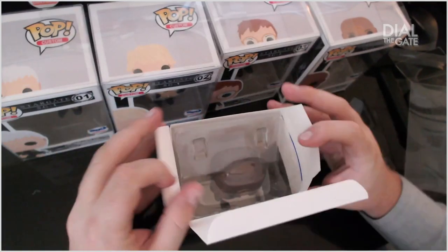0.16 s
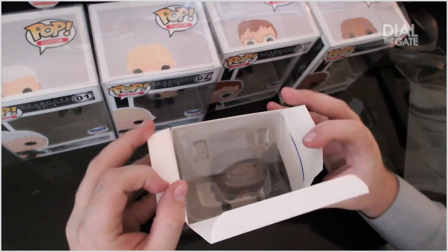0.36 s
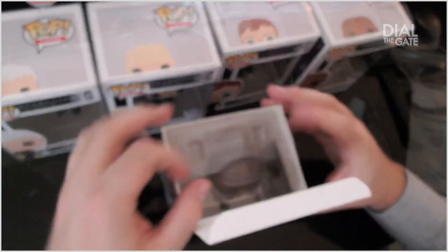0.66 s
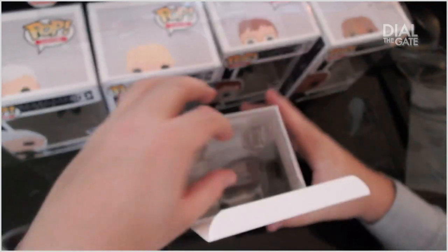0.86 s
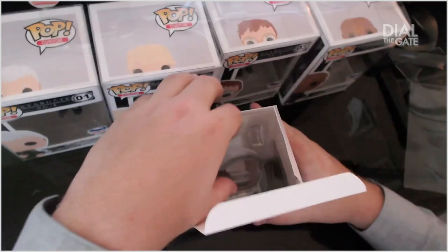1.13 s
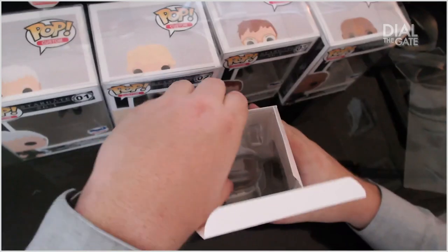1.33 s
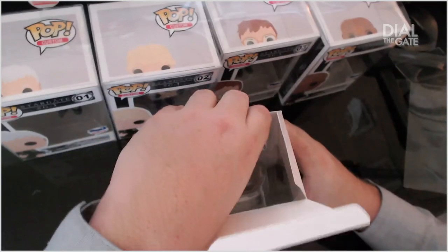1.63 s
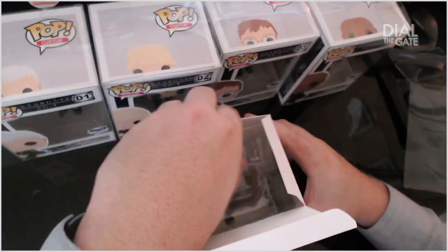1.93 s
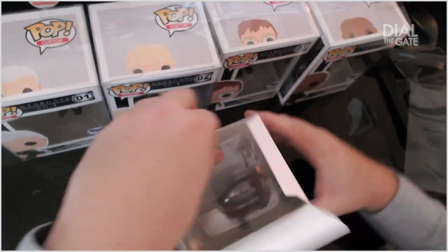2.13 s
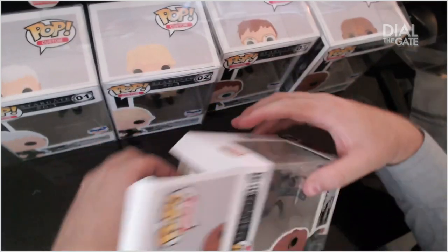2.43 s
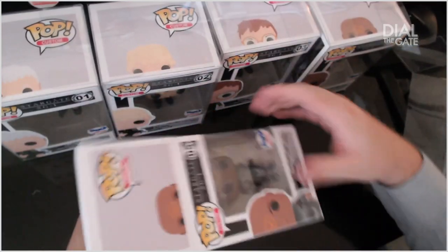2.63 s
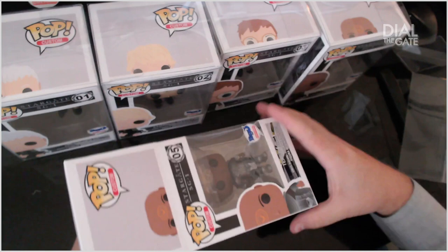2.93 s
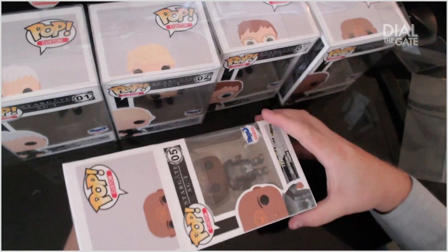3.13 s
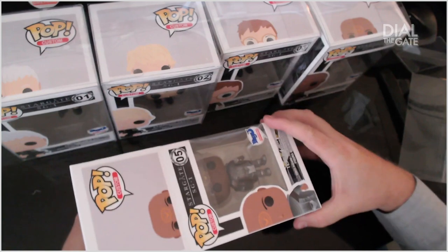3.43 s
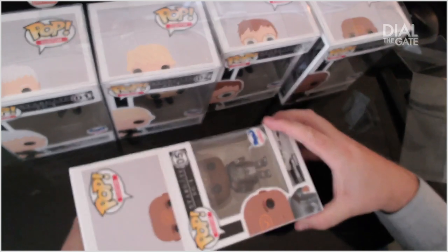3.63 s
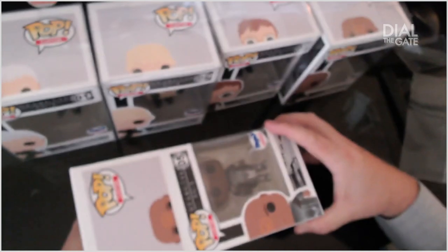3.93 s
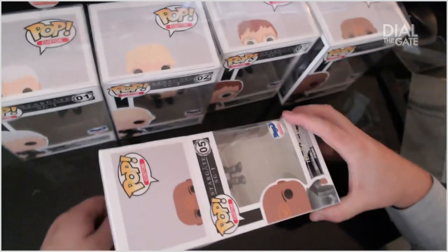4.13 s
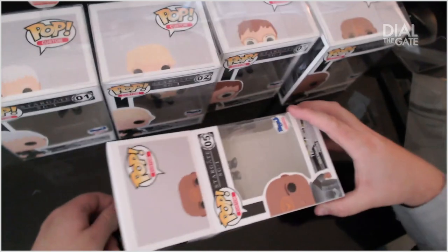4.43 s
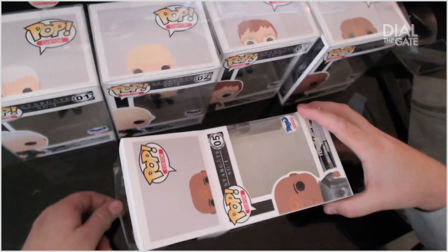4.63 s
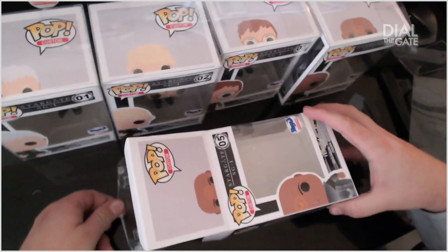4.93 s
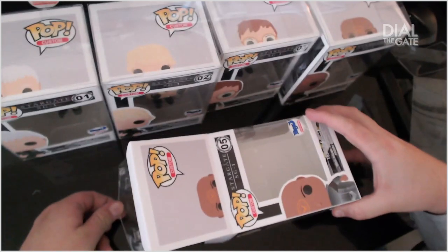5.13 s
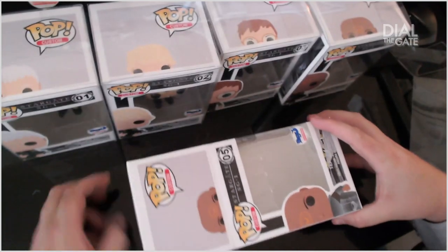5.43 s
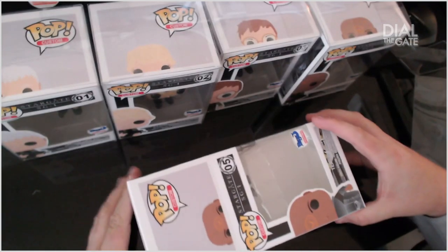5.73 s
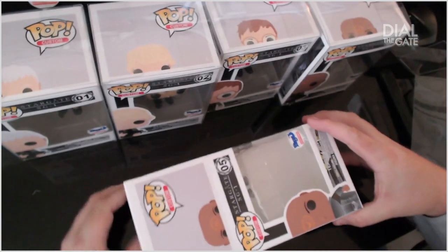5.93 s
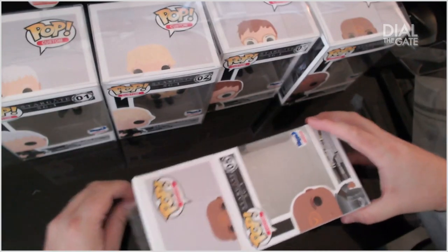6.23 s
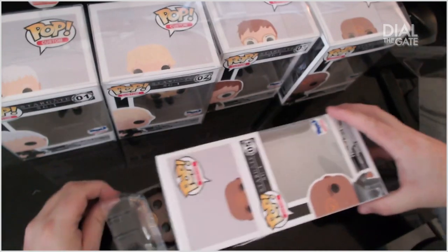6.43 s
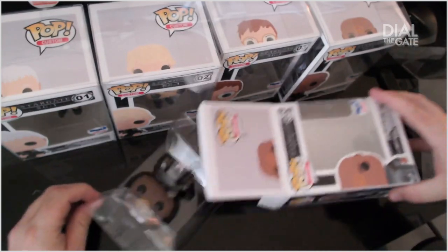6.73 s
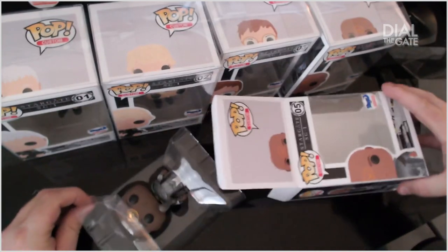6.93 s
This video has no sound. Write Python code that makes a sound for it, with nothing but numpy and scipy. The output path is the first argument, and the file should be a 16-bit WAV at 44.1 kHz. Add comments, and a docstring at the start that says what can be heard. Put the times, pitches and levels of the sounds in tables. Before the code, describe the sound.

Close to the microphone, hands open a small cardboard box on a table. Sparse dull taps and faint plastic ticks come first, then a hollow bump with low table thuds around a third of the way in. Midway a tight cluster of sharp plastic cracks bursts out, by far the loudest moment. Separate clicks, short scrapes and more knocks follow as the tray slides free. Quiet hum and hiss lie beneath, with short room echoes.

```python
"""Over a quiet hum and hiss, hands start to open a small cardboard box on a table, close to the microphone.
Knocks ring the box walls as decaying tones, and rubbing is made of grains of noise.
A thin plastic tray ticks in short bright bursts of noise as it is pulled out, most loudly near 3.9 s.
Thuds of the table are low, brief swings; the handling goes on to about 7 s.
A furnished room answers everything with fading echoes."""
import sys
import numpy as np
from scipy import signal
from scipy.fft import rfft, irfft, next_fast_len
from scipy.io import wavfile
from scipy.ndimage import uniform_filter1d

SR = 44100
rng = np.random.default_rng(int(sys.argv[2]) if len(sys.argv) > 2 else 0)


def gain_from_db(level_db):
    """Convert decibel levels to linear amplitude factors (20 dB per decade)."""
    decades = np.asarray(level_db, float) / 20
    return 10 ** decades


def generate_wav(signal):
    """Clip the signal to [-1, 1] and save it as 16-bit WAV at the path in sys.argv[1]."""
    frames = np.transpose(np.atleast_2d(signal))
    scaled = np.clip(frames, -1, 1) * 32767
    pcm = np.round(scaled).astype(np.int16)
    wavfile.write(sys.argv[1], SR, pcm)


N = 311787  # samples in the scene
TIME = np.arange(N) / SR  # seconds

# ringing modes of the box walls and the air inside, before the grip retunes and shortens them:
# (pitch_hz, level_db, t60_s: time to fall by 60 dB)
BOX_MODES = [(240, -27, 0.092), (344, -16, 0.024), (425, 10, 0.042), (523.4, 4.5, 0.06),
             (634.3, 2.5, 0.075), (744, 4, 0.053), (939, 3.5, 0.061), (1080, 1, 0.067), (1192, 5, 0.052),
             (1350, 9.5, 0.023), (1610, 9.5, 0.023), (1716.6, 7, 0.04), (2120, 12, 0.0086),
             (2433, 10, 0.017), (2784, 7.5, 0.0063), (3078, -9, 0.052)]


def rms1(x):
    """Scales a sound to an rms of 1, so that a later gain sets its level."""
    return x / np.sqrt(np.mean(x ** 2))


def colour(x, points):
    """Filters a sound by a spectrum of (pitch_hz, level_db) points; outside them it is nearly silent."""
    hz, db = np.transpose(points)
    size = next_fast_len(len(x))
    bins_hz = np.arange(size // 2 + 1) * SR / size + 1
    gain_db = np.interp(np.log(bins_hz), np.log(hz), db, left=-80, right=-80)
    return irfft(rfft(x, size) * gain_from_db(gain_db), size)[:len(x)]


def add(out, start_s, db, shape):
    """Adds a sound at start_s, scaled so that its loudest millisecond reaches db (a full sine is 0 dB)."""
    first = int(start_s * SR)
    part = shape[:N - first]
    loudest_power = uniform_filter1d(shape ** 2, size=48).max()
    out[first:first + len(part)] += gain_from_db(db) * part / np.sqrt(2 * loudest_power)


def burst(noise, length_ms):
    """Many tiny contacts that swell quickly and die away; together they favour no pitch."""
    t = np.arange(len(noise)) / SR * 1000 / max(length_ms, 0.2)
    power_shape = (1 - np.exp(-3.0 * t)) * np.exp(-t)
    spectrum = rfft(noise * power_shape)
    flat = irfft(spectrum / np.abs(spectrum))  # every pitch equally strong
    return flat * np.sqrt(power_shape)


def grit(spread_db, grain_ms):
    """Friction noise in short grains of very uneven size."""
    grain = max(int(grain_ms * SR / 1000), 1)
    size_db = spread_db * np.minimum(rng.exponential(size=N), 5.0)
    size_db = np.repeat(size_db, grain)[:N]
    smooth_size = uniform_filter1d(gain_from_db(size_db), grain)
    return rms1(rng.standard_normal(N) * smooth_size)


def floor():
    """Air and microphone hiss as coloured noise, with the low wavering hum of a machine in the house."""
    # hum tones: (pitch_hz, level_db: rms)
    hum_tones = [(32.3, -70), (193.8, -82.5)]
    # shape of the hiss: (pitch_hz, relative level_db per Hz)
    air_spectrum = [(15, -33), (25, 2.5), (40, -10.5), (60, -4), (120, -28), (200, -10.5), (400, -9),
                    (1000, -19.5), (2300, -27.5), (3500, -29), (8000, -28), (12000, -30), (15500, -30),
                    (16300, -35)]
    air_db = -70  # rms
    waver_db = 2.4 * rms1(colour(rng.standard_normal(N), [(1.5, -3), (10, 11), (30, -27)]))
    hum = np.zeros(N)
    for hz, db in hum_tones:
        hum += gain_from_db(db + waver_db) * np.sqrt(2) * np.sin(2 * np.pi * hz * TIME)
    hiss = gain_from_db(air_db) * rms1(colour(rng.standard_normal(N), air_spectrum))
    return hum + hiss


def room(x):
    """Dense echoes, made of noise whose fading time depends on pitch."""
    # fading of the room: (pitch_hz, t60_s: time to fall by 60 dB)
    room_fading = [(125, 0.084), (500, 0.39), (2000, 0.17), (6000, 0.33), (14000, 0.15)]
    echo_db = -7.5  # energy of the echoes against the direct sound
    hz, t60 = np.transpose(room_fading)
    f, t, z = signal.stft(rng.standard_normal(SR), SR, nperseg=256)
    t60_at_f = np.interp(np.log(f + 1), np.log(hz), t60)
    z = z * 1000 ** (-t / t60_at_f[:, None])
    tail = signal.istft(z, SR, nperseg=256)[1][:SR]
    tail = tail * (1 - np.exp(-TIME[:SR] / 0.0051))  # the first surfaces are a metre or two off
    tail = tail / np.sqrt(np.sum(tail ** 2))
    return gain_from_db(echo_db) * signal.fftconvolve(x, tail)[:N]


def thuds():
    """The table top swings briefly under the weight of box and hands: low sines that die away."""
    # thuds: (start_s, level_db: loudest millisecond, pitch_hz, t60_s: time to fall by 60 dB)
    thud_table = [(0.069, -53.5, 152, 0.17), (0.598, -57.5, 97, 0.1), (2.231, -51, 45, 0.36),
                  (2.344, -54, 80, 0.11), (2.472, -41, 45, 0.13), (2.549, -59, 102, 0.17),
                  (2.602, -42, 89, 0.48), (2.639, -46, 74.5, 0.22), (2.799, -50, 76.6, 0.32),
                  (2.851, -53.5, 246, 0.17), (3.316, -51.5, 255, 0.062), (3.896, -38, 248, 0.1),
                  (5.273, -50.5, 212.5, 0.22), (6.429, -47, 216, 0.11), (6.548, -51, 69.6, 0.064),
                  (6.709, -40, 240, 0.029)]
    out, t = np.zeros(N), np.arange(SR // 2) / SR
    for start_s, db, hz, t60 in thud_table:
        swell = 1 - np.exp(-t / 0.0061)
        fade = 1000 ** (-t / max(t60, 0.02))
        add(out, start_s, db, np.sin(2 * np.pi * hz * t) * swell * fade)
    return out


def slide_levels():
    """Friction levels of box, tray and table: slides swell, hold and fade, their power added to the grip's."""
    # slides of hand, box and tray: (start_s, length_s, box_level_db, tray_level_db, table_level_db)
    slide_table = [(0.0, 0.22, -65.5, -83, -63), (0.313, 0.11, -64, -87, -69), (0.52, 0.095, -74, -97, -66),
                   (1.008, 0.37, -71, -82, -73.5), (1.412, 0.087, -66, -77, -75),
                   (1.665, 0.18, -64, -75, -70), (2.014, 0.19, -68, -76, -70), (2.298, 0.12, -70, -75, -64),
                   (2.492, 0.099, -49.5, -67.5, -50), (2.6, 0.075, -62, -74, -64),
                   (2.74, 0.084, -73, -82, -64.5), (2.83, 0.22, -68, -78, -68),
                   (3.06, 0.16, -57.5, -68, -67), (3.308, 0.14, -67, -72, -70),
                   (3.537, 0.08, -61.5, -64, -76), (3.65, 0.11, -69, -70.5, -69),
                   (3.914, 0.054, -46, -43, -57.5), (4.012, 0.047, -53, -64, -60),
                   (4.1, 0.19, -57, -69.5, -66), (4.322, 0.14, -60, -66.5, -64.5),
                   (4.473, 0.074, -58.5, -66, -64), (4.617, 0.3, -69.5, -78, -72),
                   (4.868, 0.064, -70.5, -68.5, -81), (4.946, 0.063, -57.5, -57.5, -79),
                   (5.121, 0.19, -57, -62, -64.5), (5.522, 0.067, -51.5, -58.5, -60.5),
                   (5.62, 0.13, -62.5, -75.5, -66.5), (6.015, 0.045, -60, -65.5, -70),
                   (6.13, 0.07, -50, -59, -58), (6.277, 0.13, -54, -58.5, -63.5),
                   (6.455, 0.02, -50, -60, -51.5), (6.543, 0.078, -52, -57.5, -53.5),
                   (6.629, 0.089, -55, -58.5, -56), (6.834, 0.019, -59, -70.5, -62),
                   (6.941, 0.11, -67, -67, -62)]
    # friction while the hands only hold on: (box_level_db, tray_level_db, table_level_db)
    resting_db = (-81, -82, -74)
    rise_db_s, fall_db_s = 322, 152  # swell before the start, fade after the end, in dB per second
    power = gain_from_db(2 * np.array(resting_db))[:, None] * np.ones(N)
    for start_s, length_s, *db in slide_table:
        before_s = np.maximum(start_s - TIME, 0)
        after_s = np.maximum(TIME - start_s - length_s, 0)
        shape_db = -rise_db_s * before_s - fall_db_s * after_s
        power = power + gain_from_db(2 * np.array(db))[:, None] * gain_from_db(2 * shape_db)
    return 10 * np.log10(power)


def rubbing():
    """Friction grains and stray taps, fluttering with the grip, drive box and tray; the table adds soft noise."""
    # colour of the rubbed plastic: (pitch_hz, relative level_db per Hz)
    tray_spectrum = [(1470, -15), (2500, 0), (3180, -1), (4050, -7.5), (4690, -5.5), (5870, -10.5),
                     (9660, -10), (14500, -21.5), (16000, -23)]
    lift_db, lift_per_db = 5.5, 0.6753  # gain of the upper box modes, and its change with the tray's share
    taps_per_s, tap_db, tap_spread_db = 25, 2, 2.5  # stray light taps, level over the steady friction
    grain_spread_db = 2.3

    box_db, tray_db, table_db = slide_levels()
    upper_db = np.clip(lift_db + lift_per_db * (tray_db - box_db), -12, 12)
    grip_db = 0.88 * rms1(colour(rng.standard_normal(N), [(8, 30), (60, -49), (200, -26)]))

    tap_happens = rng.random(N) < taps_per_s / SR
    taps = tap_happens * gain_from_db(tap_db + tap_spread_db * np.minimum(rng.exponential(size=N), 3))
    # the power of each tap dies away with a time constant of 4.2 ms
    tap_power = signal.lfilter([1], [1, -np.exp(-1000 / SR / 4.2)], taps ** 2)
    snag = np.sqrt(1 + tap_power)

    grains = grit(grain_spread_db, 2.3) * gain_from_db(grip_db) * snag
    is_upper = np.array(BOX_MODES)[:, 0] > 1000
    # each half of the box rings with the other half turned down by 60 dB
    low = signal.fftconvolve(grains, ring(-60.0 * is_upper, shorten=0.34))[:N]
    high = signal.fftconvolve(grains, ring(-60.0 * ~is_upper, shorten=0.34))[:N]
    box = (rms1(low) + rms1(high) * gain_from_db(upper_db)) * gain_from_db(box_db)

    plastic = colour(grit(grain_spread_db, 2.0) * snag, tray_spectrum)
    tray = rms1(plastic) * gain_from_db(tray_db + grip_db)

    wood_spectrum = [(30, -6), (66, -6.5), (77, -0.5), (90, -5.0), (200, -7), (400, -20.0)]
    table = rms1(colour(rng.standard_normal(N), wood_spectrum)) * gain_from_db(table_db)
    return box + tray + table


def ticks():
    """Thin plastic buckles: a few ms of ragged bright crackle around a centre, each with its own patchy colour."""
    # ticks of the tray: (start_s, level_db: loudest millisecond, centre_hz, crackle_length_ms)
    tick_table = [(0.0852, -54.5, 4250, 1.9), (0.169, -64, 3500, 2.6), (0.212, -62.5, 5000, 8),
                  (0.251, -63, 3500, 2.6), (0.326, -62, 2600, 3.1), (0.3395, -50.5, 4750, 5.4),
                  (0.5731, -62, 4830, 4.3), (0.587, -57.5, 8570, 4), (0.638, -63, 4500, 2.4),
                  (1.0031, -66, 5660, 3.5), (1.0151, -62, 5650, 3.5), (1.0298, -54.5, 3830, 3),
                  (1.1095, -51, 3870, 3.2), (1.2144, -50, 4000, 5), (1.31, -56, 3880, 2.6),
                  (1.332, -54.5, 5340, 2.5), (1.508, -44.5, 7800, 2), (1.657, -58.5, 3450, 3.8),
                  (1.792, -58, 6040, 5.4), (2.02, -45.5, 8600, 8.1), (2.045, -52.5, 5500, 2.8),
                  (2.0988, -54, 4900, 3.3), (2.1264, -52.5, 7460, 3.5), (2.1793, -48.5, 4660, 2.3),
                  (2.4614, -51, 3570, 2.3), (2.5417, -46.5, 8150, 7.8), (2.842, -51.5, 4800, 6.4),
                  (3.032, -56.5, 4830, 5.1), (3.098, -45, 7960, 4.9), (3.2088, -52.5, 3770, 3.6),
                  (3.304, -48, 3570, 2.1), (3.4157, -50, 6130, 1.9), (3.4447, -51, 4770, 5.8),
                  (3.513, -49.5, 3550, 1.7), (3.5435, -33.5, 8100, 3.5), (3.646, -36, 10200, 2.7),
                  (3.7494, -50.5, 8400, 4.7), (3.8484, -49, 8770, 3.5), (3.8549, -33, 8520, 3.1),
                  (3.8602, -20.5, 8300, 2.8), (3.869, -29.5, 5840, 13), (3.8916, -25, 5270, 1.9),
                  (3.897, -25.5, 8700, 20), (3.912, -38.5, 4720, 8), (3.9521, -21.5, 5170, 2.4),
                  (4.104, -52, 3580, 3.9), (4.1284, -46, 7850, 3), (4.158, -41, 4800, 1.2),
                  (4.4937, -36.5, 10000, 2.5), (4.6808, -61.5, 3580, 8.4), (4.8, -50, 5000, 4.6),
                  (4.9317, -51, 6540, 3.5), (4.9442, -33.5, 5660, 2.5), (4.984, -48, 8210, 4),
                  (5.146, -45.5, 3500, 3.9), (5.209, -42, 9050, 4.5), (5.2796, -48.5, 6440, 5.2),
                  (5.321, -64, 4050, 3.5), (5.3904, -58, 4480, 3.2), (5.484, -53.5, 4920, 16),
                  (5.511, -44, 7900, 6.8), (5.5278, -37, 5500, 5.2), (5.5411, -35, 4200, 3.5),
                  (5.61, -52, 5000, 2.6), (6.1056, -43, 3700, 12), (6.1228, -38, 7760, 5.1),
                  (6.2836, -54, 8270, 4), (6.297, -44, 4560, 4.1), (6.344, -36.5, 7500, 4.4),
                  (6.4375, -31.5, 7700, 3.2), (6.445, -38.5, 6540, 3.8), (6.5327, -39, 8550, 5),
                  (6.5448, -40, 5260, 4.1), (6.5872, -45, 4460, 3.5), (6.617, -46, 4580, 4.2),
                  (6.673, -46, 3480, 5.2), (6.755, -59, 3470, 2.9), (6.9457, -60, 3450, 5.8),
                  (7.006, -41, 5300, 9.5)]
    fall_db = 3.5  # per octave either side of a tick's centre
    patch_db, ragged_db = 3.0, 2.5  # random spread over pitch, and over time
    out, grid_hz = np.zeros(N), np.geomspace(1000, 16500, 24)
    # all ticks share the colour of the plastic sheet
    sheet_db = np.interp(np.log(grid_hz), np.log([1000, 2600, 10000, 16500]), [-7, 7.5, 3.5, -14.5])
    for start_s, db, centre_hz, length_ms in tick_table:
        octaves = np.abs(np.log2(grid_hz / centre_hz))
        patches_db = patch_db * rng.standard_normal(len(grid_hz))
        tone = np.transpose([grid_hz, sheet_db - fall_db * octaves + patches_db])
        # a new random gain every 64 samples
        ragged = gain_from_db(ragged_db * np.repeat(rng.standard_normal(64), 64))
        crackle = burst(rng.standard_normal(4096), length_ms) * ragged
        add(out, start_s, db, colour(crackle, tone))
    return out


def ring(gain_db, shorten=0.44, bend=0.9417):
    """The box walls ring as a sum of decaying sines, one per mode; a high-pass keeps it thin in the bass."""
    bass_cut_hz = 157
    hz, db, t60 = np.array(BOX_MODES).T[:, :, None]
    t = np.arange(4096) / SR
    sign = (-1.0) ** np.arange(len(BOX_MODES))[:, None]  # neighbouring modes start in opposite directions
    swing = np.sin(2 * np.pi * bend * hz * t)
    fade = 1000 ** (-t / (t60 * shorten))
    walls = (sign * gain_from_db(db + gain_db[:, None]) * swing * fade).sum(0)
    return signal.sosfilt(signal.butter(2, bass_cut_hz, "high", fs=SR, output="sos"), walls)


def knocks():
    """A short rough contact rings the box; modes near the struck wall's pitch are driven most."""
    # knocks on the box: (start_s, level_db: loudest millisecond before the treble is softened,
    # best_driven_pitch_hz, fall_above_it in dB per octave, contact_length_ms)
    knock_table = [(0.058, -47, 350, 7, 3.1), (0.084, -31.5, 612, 3, 1.6), (0.229, -52.5, 354, 0, 2),
                   (0.337, -48.5, 750, -1, 8.4), (0.573, -45.5, 330, 1, 10.6), (1.007, -51, 625, 5, 6),
                   (1.096, -45.5, 1057, 8, 10.6), (1.218, -42, 1350, 13, 3), (1.366, -31.5, 448, 0, 1.1),
                   (1.403, -54, 910, 19, 1.3), (1.505, -45.5, 884, -1, 3.1), (1.662, -38.5, 435, 3.5, 2.06),
                   (2.026, -44, 993, 1.2, 4.2), (2.125, -46, 970, 1, 1.7), (2.175, -47, 1004, 2.2, 6.2),
                   (2.21, -47.5, 1015, 4, 5.2), (2.253, -46.5, 1020, 0, 2.7), (2.325, -50, 1080, 6, 6.2),
                   (2.355, -37, 448, 9, 2.8), (2.461, -29.5, 623, 9.5, 3.6), (2.487, -38, 508, 5.5, 8.4),
                   (2.545, -30, 764, 5, 1.4), (2.553, -34, 402, 2, 4.7), (2.594, -41.5, 430, -3, 6.1),
                   (2.85, -43.5, 824, 22, 4.1), (2.898, -49, 970, 15, 3.0), (3.034, -46.5, 425, 4, 6.2),
                   (3.07, -40, 756, 20, 3.4), (3.094, -32.5, 1126, 10, 4.9), (3.207, -43, 935, 5, 2.3),
                   (3.303, -38, 887, 1.5, 1.93), (3.414, -40.5, 934, 3, 1.7), (3.445, -45, 1590, -11, 1.6),
                   (3.512, -42, 940, 3, 3.7), (3.541, -33.5, 1200, 14, 6.2), (3.626, -49, 895, -4, 4.2),
                   (3.645, -38, 1170, 10, 4.3), (3.75, -44, 1250, -4, 3.9), (3.847, -34.5, 770, 15, 6.3),
                   (3.859, -23, 1005, 2.5, 1.9), (3.867, -25.5, 1080, 18, 2.25),
                   (3.89, -30.5, 2870, 2.2, 6.4), (3.899, -26.5, 2490, -6, 4.6), (3.911, -27, 980, 39, 6.6),
                   (3.951, -25, 409, 1.5, 2.5), (3.904, -25, 425, 2, 3.3), (3.994, -32.5, 710, 22, 1.6),
                   (4.125, -45, 390, 3, 3.3), (4.156, -39, 398, 1, 4.4), (4.302, -50, 415, -1, 4.7),
                   (4.494, -32.5, 395, 1.5, 3.7), (4.675, -50, 757, -5, 10), (4.801, -47, 1380, -2, 4.6),
                   (4.929, -41, 1350, -4, 6.7), (4.944, -23, 1895, -7, 1.35), (4.947, -33, 383.7, 16, 2.94),
                   (4.983, -32, 800, 5, 3), (5.115, -44.5, 378, -2, 1.5), (5.196, -44, 2560, 9, 3.0),
                   (5.208, -43.5, 453, -12, 6.9), (5.281, -35, 360, 1, 2.2), (5.485, -39.5, 1080, 13, 2.4),
                   (5.513, -37, 1780, 17, 4.3), (5.529, -31.5, 930, 2.5, 3), (5.541, -27.5, 1330, 5, 2.5),
                   (5.825, -49, 740, 0.5, 1.1), (6.126, -35.5, 500, 2.5, 3.1), (6.198, -28.5, 688, 41, 0.6),
                   (6.284, -39, 708, 15, 1.9), (6.344, -27, 928, 13, 4.7), (6.439, -26.5, 777, 5, 5.9),
                   (6.446, -26.5, 463, 6.5, 1.5), (6.539, -30, 2730, -10, 3), (6.548, -30, 327, -0.5, 5.5),
                   (6.579, -38.5, 496, 19, 12), (6.62, -31.5, 892, -3.5, 7.7), (6.755, -43, 480, -6, 1.5),
                   (6.957, -45, 940, 7, 4.3), (7.008, -35, 960, -3, 9.3)]
    # fall below the best-driven pitch in dB per octave: for a knock at -50 dB,
    # and its change per dB of strength
    fall_below_db, fall_per_db = 4, 0.33
    scatter_db, struck_lift_db = 2.5, 3  # random spread of the modes, extra gain of the struck one
    soft_hz = 4200
    out, mode_hz = np.zeros(N), np.array(BOX_MODES)[:, 0]
    for start_s, db, best_hz, above_db, contact_ms in knock_table:
        below_db = fall_below_db + fall_per_db * (db + 50)
        octaves = np.log2(mode_hz / best_hz)
        gain_db = np.where(octaves < 0, below_db, -above_db) * octaves
        gain_db = gain_db + scatter_db * rng.standard_normal(len(BOX_MODES))
        nearest = np.argmin(np.abs(octaves))
        gain_db[nearest] += struck_lift_db
        # the grip tightens or slackens the walls, which retunes them all a little
        walls = ring(gain_db, bend=best_hz / mode_hz[nearest])
        contact = burst(rng.standard_normal(2048), contact_ms)
        add(out, start_s, db, signal.fftconvolve(contact, walls))
    # a low-pass softens the treble of the knocks
    return signal.sosfilt(signal.butter(4, soft_hz, fs=SR, output="sos"), out)


def scene():
    """Everything near the microphone, its echo in the room, and the steady hum and hiss."""
    near = knocks() + ticks() + thuds() + rubbing()
    return (near + room(near) + floor())[None]


def band_limit(x):
    """A steep low-pass at the top of the band."""
    return signal.sosfilt(signal.butter(12, 16500, fs=SR, output="sos"), x)


def record(dry):
    """Turns the finished mix into the sound that is written."""
    return band_limit(dry)


dry = scene()
out = record(dry)
generate_wav(out)
```